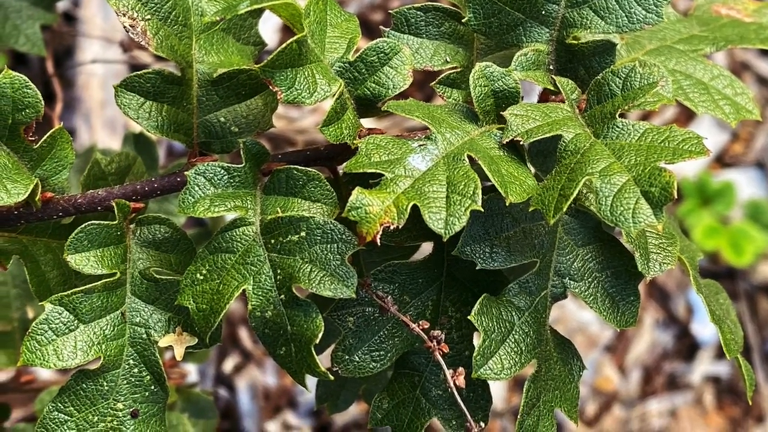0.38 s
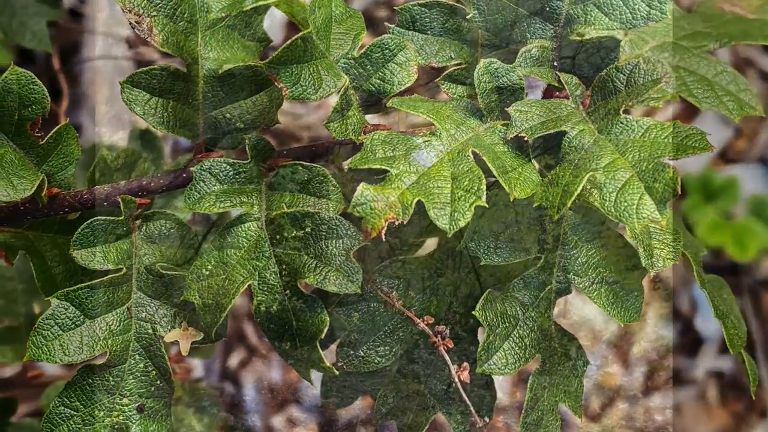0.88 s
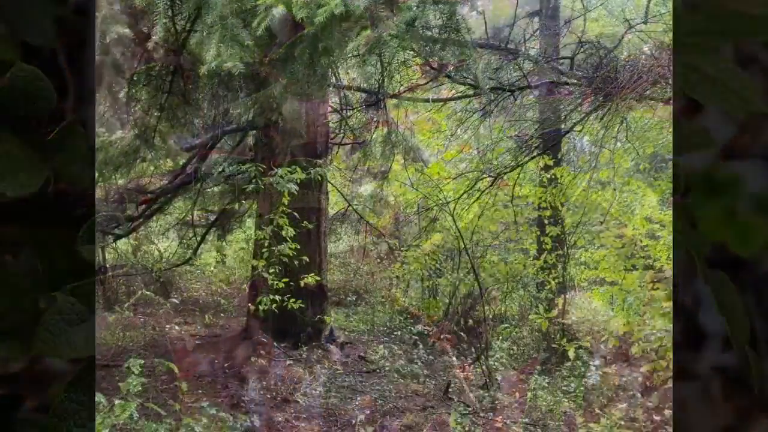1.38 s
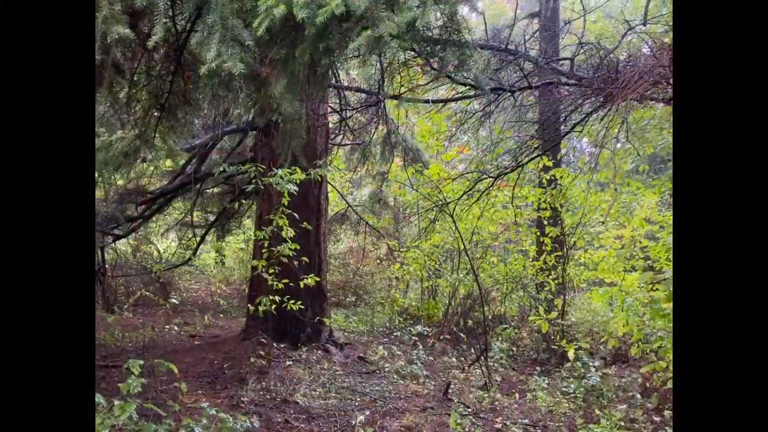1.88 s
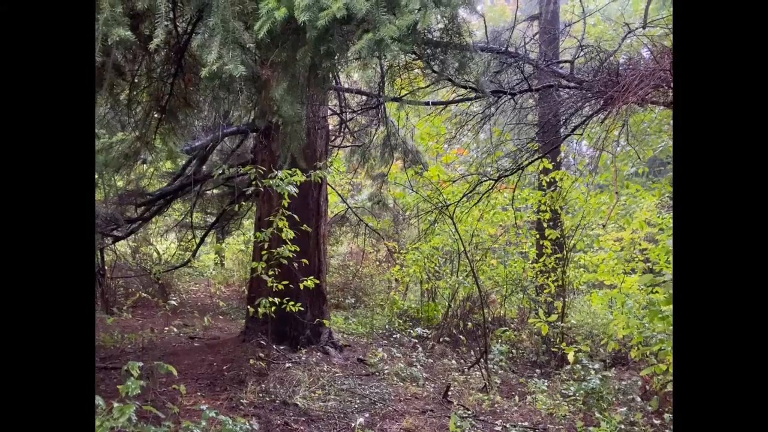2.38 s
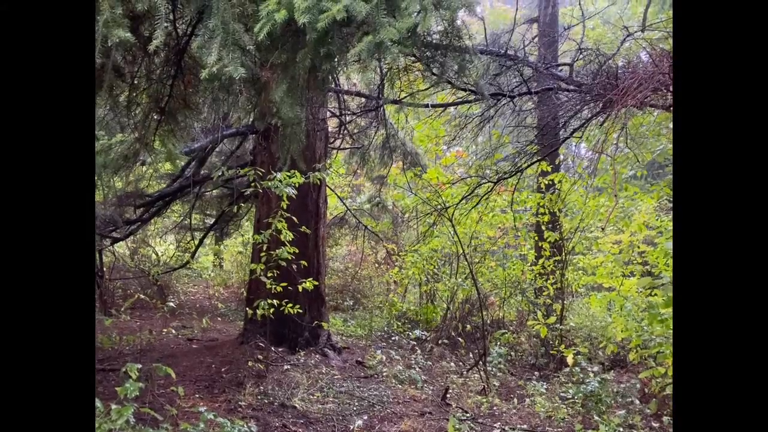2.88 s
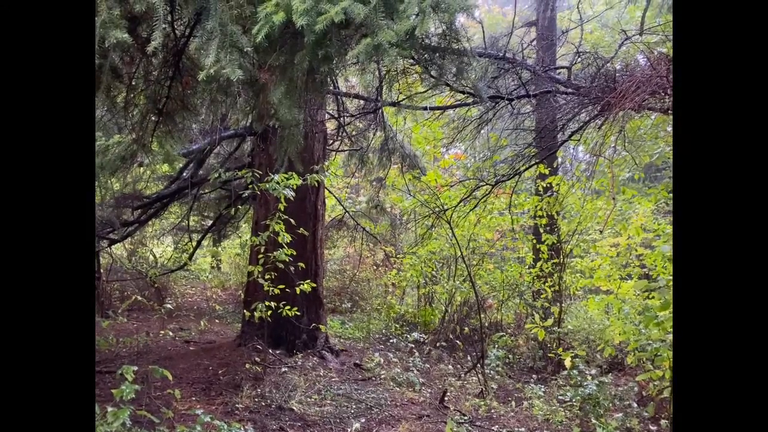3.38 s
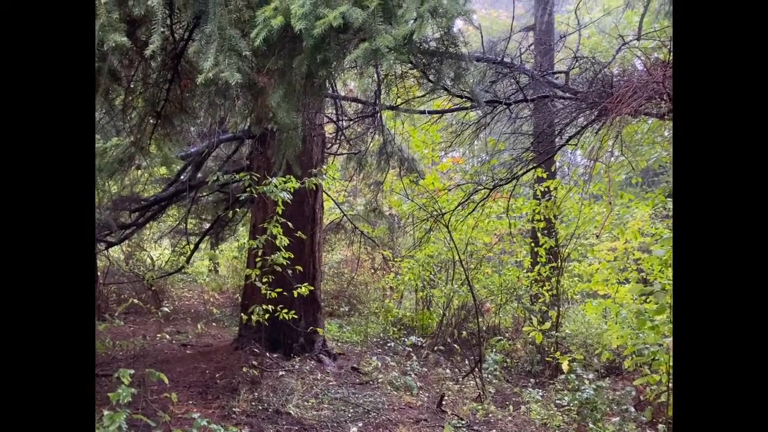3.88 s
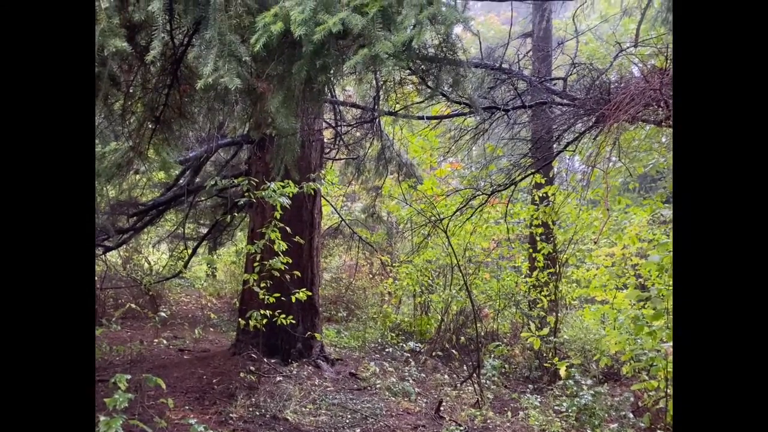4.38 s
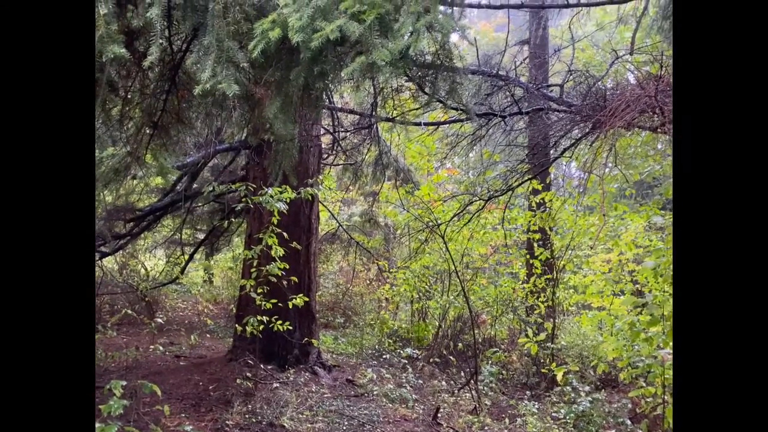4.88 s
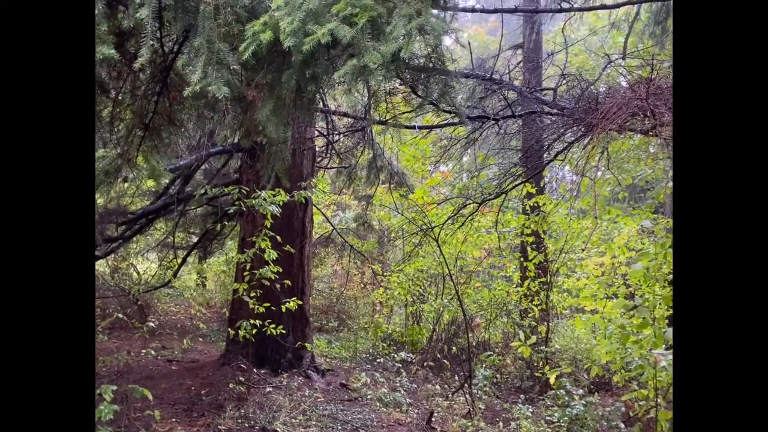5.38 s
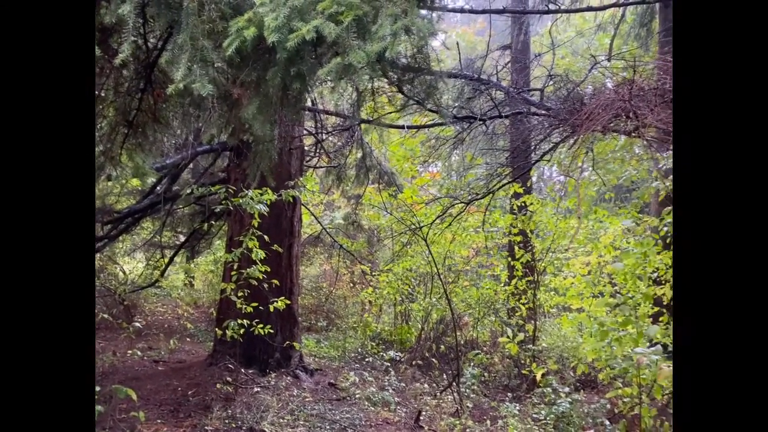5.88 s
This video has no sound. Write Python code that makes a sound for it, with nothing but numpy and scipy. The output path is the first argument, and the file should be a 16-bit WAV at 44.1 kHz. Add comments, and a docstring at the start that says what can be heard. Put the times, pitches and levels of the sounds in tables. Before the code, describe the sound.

Rain among trees, heard outdoors through one still microphone. It emerges smoothly from silence, slightly stronger at first, then eases to an even level. Dense far rain hisses softly beneath leaf patter, scattered crisp clicks of close drops and little pitched drips, clustered around the middle. Low, woolly rumbling comes and goes, and two muffled knocks close by follow each other quickly late on.

```python
"""A forest in steady rain, heard through one microphone and faded in after a short silence.
Noise in flickering bands makes the wash of far drops; short rings make the patter on nearer leaves.
Bright clicks with a spray of noise are the nearest drops on leaves, and small notes are the drips.
Low bands of noise make a rumble that swells now and then, and two softened rings are dull thumps close by."""
import sys
import numpy as np
from scipy import signal
from scipy.io import wavfile

SR = 44100
rng = np.random.default_rng(int(sys.argv[2]) if len(sys.argv) > 2 else 0)


def file_out(sig):
    """Save sig as 16-bit WAV at sys.argv[1]."""
    # one column per channel
    cols = np.atleast_2d(sig).T
    # limit, then scale
    lim = np.clip(cols, -1, 1)
    pcm = np.round(lim * 32767).astype(np.int16)
    wavfile.write(sys.argv[1], SR, pcm)


def gain_from_decibels(decibels):
    """Convert decibel values to linear amplitude factors."""
    exponent = np.asarray(decibels, float) / 20
    return 10 ** exponent


N = 265041  # length in samples


def rms_one(x):
    """Scales to unit power."""
    return x / np.sqrt(np.mean(x ** 2) + 1e-20)


def drift(rate_hz):
    """Slow random wander of spread 1: noise through two equal one-pole low-passes at rate_hz."""
    hop = 40  # samples between the points of the slow curve
    pole = np.exp(-2 * np.pi * rate_hz * hop / SR)
    noise = rng.standard_normal(N // hop + 2002)
    slow = signal.lfilter([1], [1, -2 * pole, pole * pole], noise)[2000:]  # skips the filter's start
    return np.interp(np.arange(N) / hop, np.arange(len(slow)), rms_one(slow))


def band(x, low_hz, high_hz):
    """Band-pass."""
    sos = signal.butter(2, [low_hz, min(high_hz, .49 * SR)], "band", fs=SR, output="sos")
    return signal.sosfilt(sos, x)


def ring(clicks, hz, t60_s):
    """Resonator: a unit click starts a sine of height 1 that falls by 60 dB in t60_s."""
    decay, turn = gain_from_decibels(-60 / (t60_s * SR)), 2 * np.pi * hz / SR
    return signal.lfilter([0, np.sin(turn)], [1, -2 * decay * np.cos(turn), decay * decay], clicks + 1e-18)


def struck(start_s, level_db, hz, t60_s):
    """One blow that rings at one pitch."""
    click = np.zeros(N)
    click[round(start_s * SR)] = gain_from_decibels(level_db)
    return ring(click, hz, t60_s)


def impacts(per_s, spread_db):
    """Random clicks of either sign, many small and few large."""
    sizes = gain_from_decibels(spread_db * np.minimum(rng.exponential(1, N), 5)) * rng.choice([-1, 1], N)
    return sizes * (rng.random(N) < per_s / SR)


def rain_db():
    """Level of the shower over time: it starts stronger and eases towards a steady level."""
    steady_db, extra_at_start_db, easing_s = -39.5, 4.0, 3.1
    return steady_db + extra_at_start_db * np.exp(-np.arange(N) / SR / easing_s)


def rumble():
    """Low bands of lumpy noise that swell and sink, each along a bell-shaped curve."""
    # Each row: middle in seconds, half width in seconds (to 1/e), level in dB at the middle, centre in Hz.
    swells = [(1.02, 0.33, -49, 165), (1.72, .5, -49.5, 350), (2.13, 0.18, -49, 68), (1.17, 1, -52, 556),
              (2.88, 0.38, -52.5, 200), (3.5, .4, -51.5, 340), (4.65, 0.39, -54, 66),
              (4.4, 0.38, -50.5, 161), (4.97, 0.53, -49, 134), (5.6, 0.43, -53.5, 75)]
    width_octaves = 0.58
    t, edge = np.arange(N) / SR, 2 ** (width_octaves / 2)
    out = np.zeros(N)
    for middle_s, half_s, level_db, hz in swells:
        lumpy_level = gain_from_decibels(level_db + 0.6 * drift(7.4))
        bell = np.exp(-((t - middle_s) / half_s) ** 2)
        noise = rms_one(band(rng.standard_normal(N), hz / edge, hz * edge))
        out += lumpy_level * bell * noise
    return out


def thumps():
    """Dull blows: a low ring with the edge of its attack softened by a band-pass."""
    # Each row: start in seconds, level in dB ahead of the softening, pitch in Hz.
    blows = [(4.53, -37, 167), (4.835, -36, 131)]
    rings = sum(struck(*blow, t60_s=0.14) for blow in blows)
    return band(rings, 60, 300)


def far_rain():
    """Drops too many to tell apart: third-octave bands of noise, each flickering a little."""
    # Colour of the far rain. Each row: frequency in Hz, relative level in dB per Hz.
    wash_colour = [(24, -37), (40, -40), (64, -0.5), (96, -4), (126, -4), (218, -2), (273, -8), (325, -2),
                   (428, -6.5), (536, -3.5), (1530, -3.5), (2100, -5.5), (3400, -8), (5320, -12),
                   (14400, -27.5), (15600, -28)]
    hz_points, db_points = np.transpose(wash_colour)
    edges_hz = 30 * 2 ** (np.arange(29) / 3)
    white = rng.standard_normal((2, N))  # neighbouring bands take turns, so they do not share noise
    together_db = 0.21 * drift(5.0)
    wash = np.zeros(N)
    for k, (low, high) in enumerate(zip(edges_hz, edges_hz[1:])):
        colour_db = np.interp(np.log(low * high) / 2, np.log(hz_points), db_points)
        flicker_db = together_db + 0.57 * drift(17.5)
        wash += gain_from_decibels(colour_db + flicker_db) * band(white[k % 2], low, high)
    return gain_from_decibels(rain_db()) * rms_one(wash)


def patter():
    """Drops on nearer leaves: each rings a few cycles at one of twenty pitches, the high ones softer."""
    level_db = -10  # against the far rain
    clicks = impacts(per_s=1500 * gain_from_decibels(1.5 * drift(8.0)), spread_db=3.5)
    pitches_hz = np.geomspace(900, 15000, 20)
    dealt = rng.integers(0, 20, N)  # which pitch a click sets ringing
    rings = np.zeros(N)
    for k, hz in enumerate(pitches_hz):
        rings += (hz / 3000) ** -.4 * ring(clicks * (dealt == k), hz, 4.0 / hz)
    return gain_from_decibels(rain_db() + level_db) * rms_one(rings)


def drips():
    """Drops into small pools or on stiff leaves, each with a short note."""
    # Each row: start in seconds, level in dB, pitch in Hz, time to fall by 60 dB in seconds.
    notes = [(0.749, -31, 1050, .02), (.9416, -35, 4306, .008), (1.1934, -30, 4306, .008),
             (1.6868, -35, 1894, .012), (1.9464, -35, 2411, .03), (2.042, -40, 3110, .1),
             (2.5575, -35, 8268, .005), (2.572, -37, 3050, .04), (2.655, -33.5, 2530, .05),
             (2.668, -38, 2750, .03), (2.687, -36, 2600, .04), (3.0626, -35, 4478, .008),
             (3.5107, -32, 3445, .008), (5.5428, -31, 4995, .006), (5.585, -32, 6000, 0.0036)]
    return sum(struck(*note) for note in notes)


def ticks():
    """A drop bursting on a leaf close by: a click of two or three cycles and a short spray."""
    # The loudest drops. Each row: start in seconds, level of the click in dB, centre in Hz.
    loud_drops = [(0.7772, -33, 12500), (0.8048, -34, 13900), (0.8826, -36, 14000), (1.6341, -38, 14300),
                  (2.1597, -40, 13900), (2.1979, -38, 12700), (2.4535, -34, 12000), (2.557, -37, 10900),
                  (2.5889, -35, 12000), (2.6584, -33, 11600), (2.7694, -41, 10700), (3.0635, -39, 15000),
                  (3.6443, -34, 12100), (4.0119, -34, 13600), (4.1334, -33.5, 14200), (4.2084, -36, 12700),
                  (4.29, -38, 14100), (4.4339, -38, 13000), (4.669, -36, 11900), (4.7234, -38, 13800),
                  (5.452, -29, 12000), (5.745, -36, 11500), (5.8773, -35, 11900)]
    rise_s, spray_fall_s, spray_db = .00007, .002, -13
    # Fainter drops come at random moments, with the same columns.
    faint_count, faint_db, faint_spread_db, faint_low_hz, faint_high_hz = 60, -44, 5.0, 8000, 14600
    spans = [N / SR, faint_spread_db, faint_high_hz - faint_low_hz]
    faint_drops = rng.random((faint_count, 3)) * spans + [0, faint_db, faint_low_hz]
    drops = [*loud_drops, *faint_drops]
    length = 400  # samples in one tick
    out, t = np.zeros(N + length), np.arange(length) / SR
    for (start_s, level_db, hz), noise in zip(drops, rng.standard_normal((len(drops), length))):
        snap = np.sin(2 * np.pi * hz * t) * t / rise_s * np.exp(1 - t / rise_s)
        spray = band(noise * np.exp(-t / spray_fall_s), 0.59 * hz, 1.2 * hz)
        out[round(start_s * SR):][:length] += gain_from_decibels(level_db) * (snap + gain_from_decibels(spray_db) * spray)
    return out[:N]


def scene():
    """One microphone: both sides carry the same sound."""
    mix = rumble() + thumps() + far_rain() + patter() + drips() + ticks()
    return np.tile(mix, (2, 1))


def band_limit(x):
    """A steep low-pass at the top of the band."""
    return signal.sosfilt(signal.butter(12, 15720, fs=SR, output="sos"), x)


def record(dry):
    """The deepest bass is cut and the level is faded up along a straight line."""
    fade_start_s, fade_full_s = .597, 1.6
    fade = np.interp(np.arange(N) / SR, [fade_start_s, fade_full_s], [0, 1])
    bass_cut = signal.sosfilt(signal.butter(4, 45, "high", fs=SR, output="sos"), dry)
    return band_limit(fade * bass_cut)


dry = scene()
out = record(dry)
file_out(out)
```